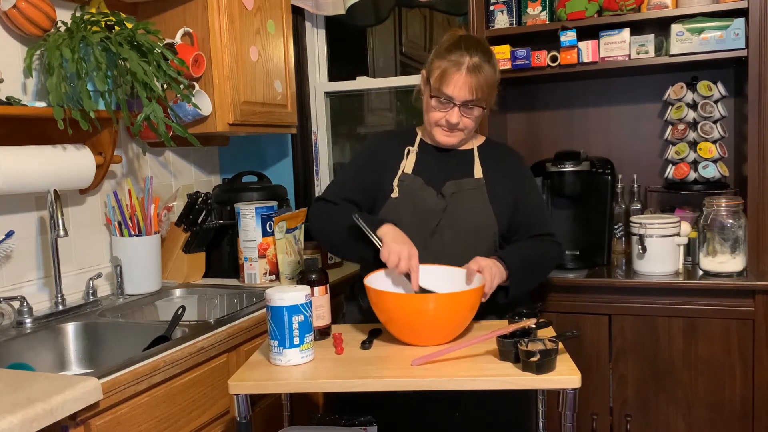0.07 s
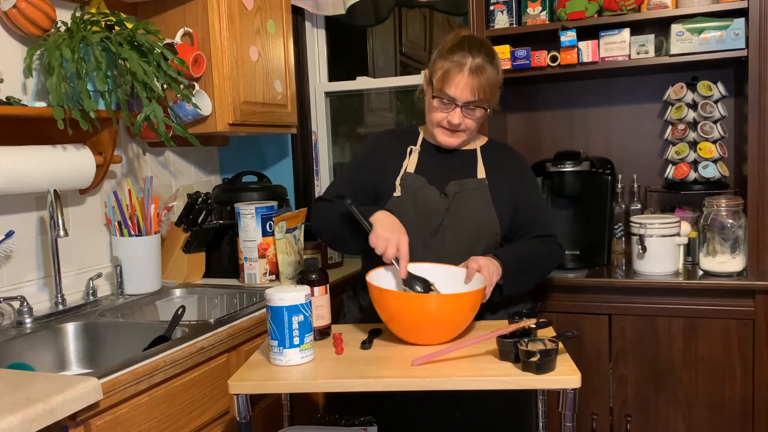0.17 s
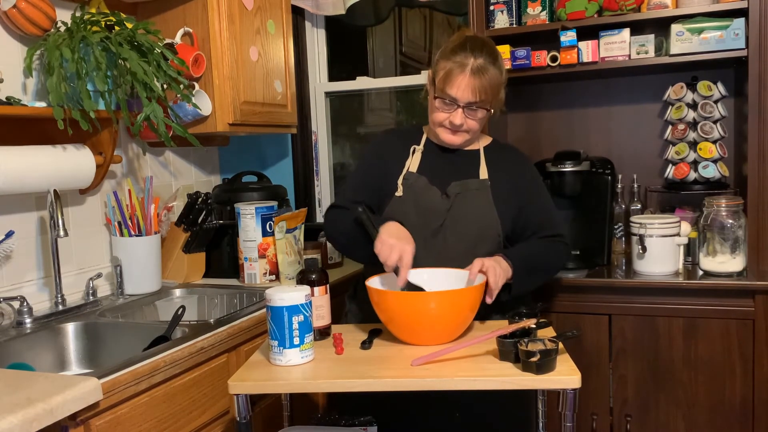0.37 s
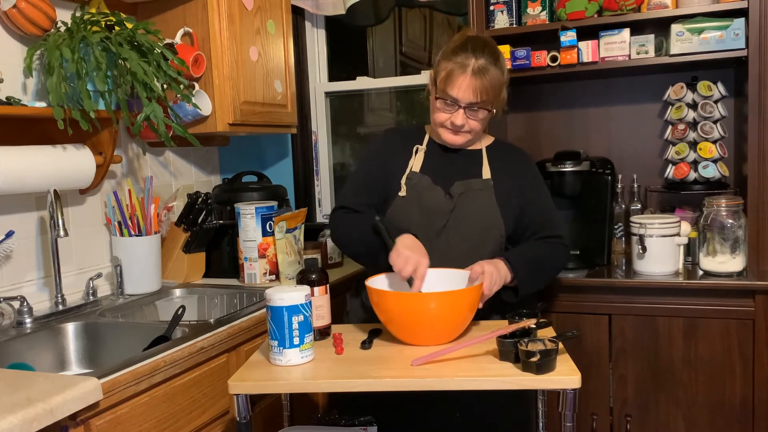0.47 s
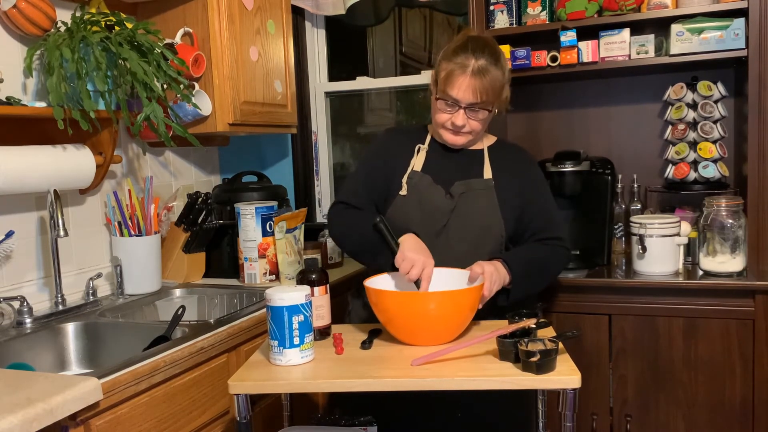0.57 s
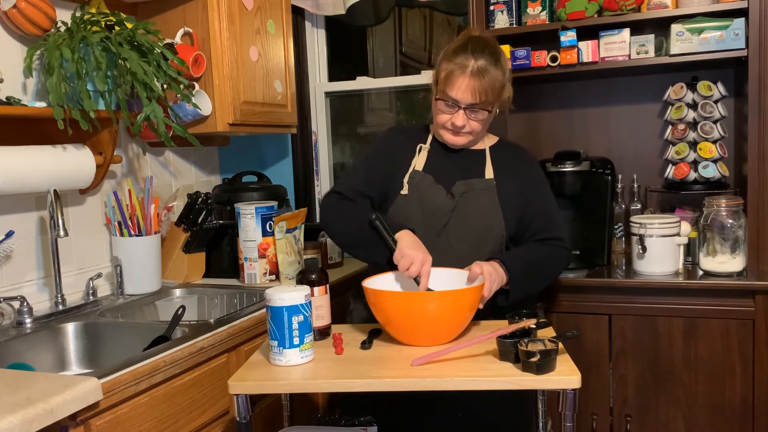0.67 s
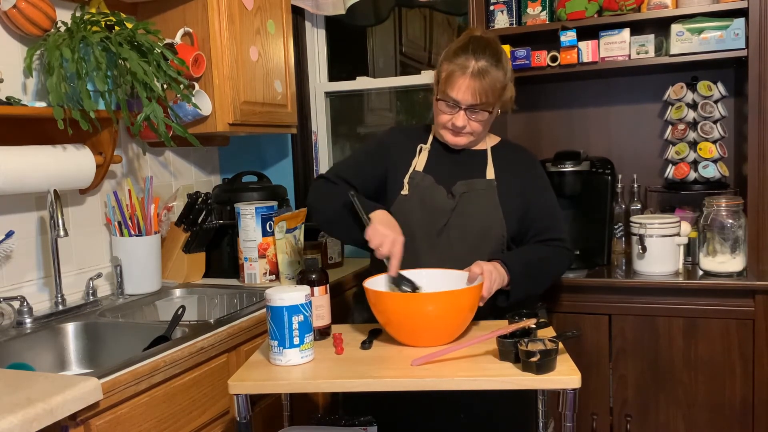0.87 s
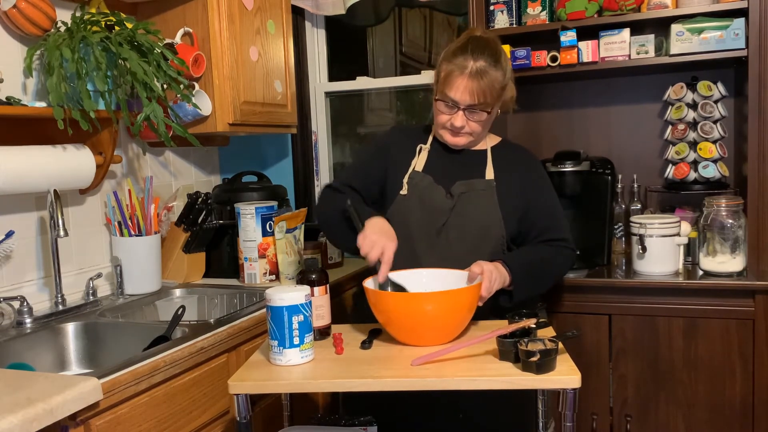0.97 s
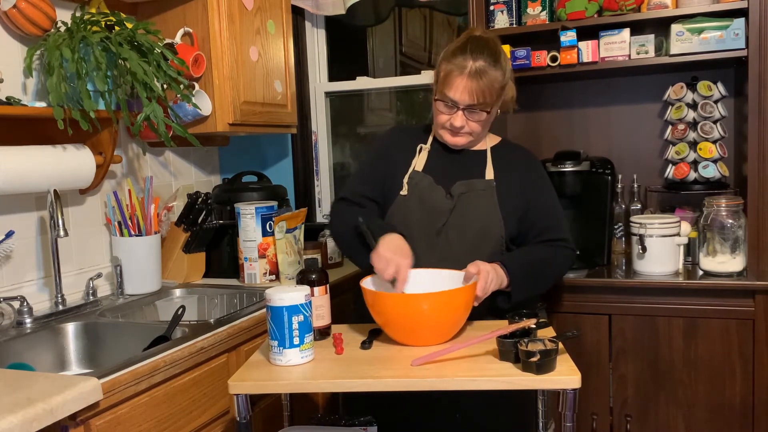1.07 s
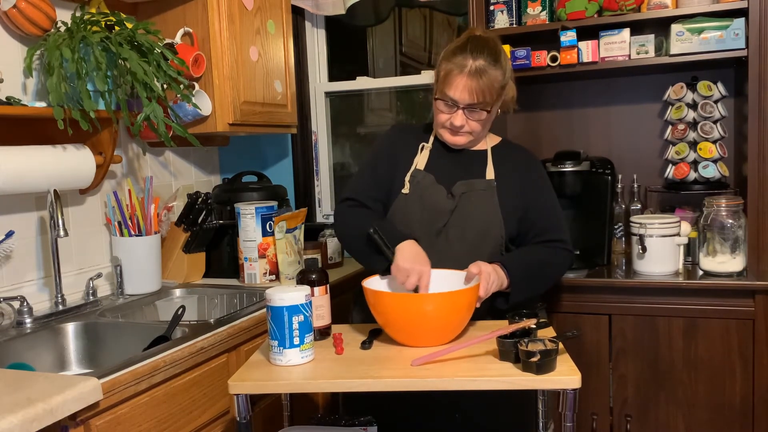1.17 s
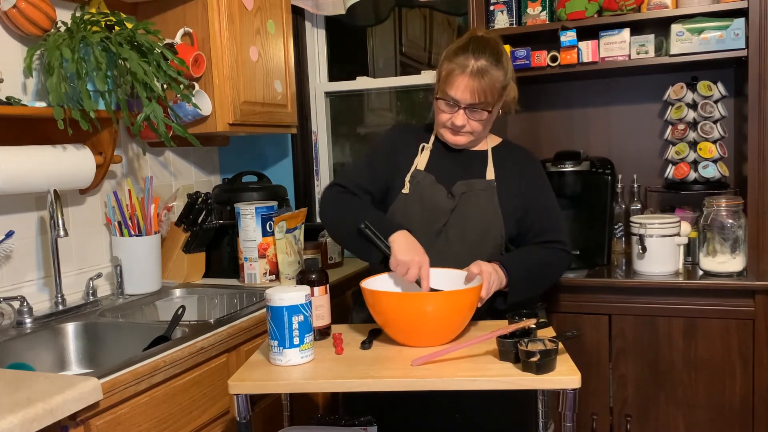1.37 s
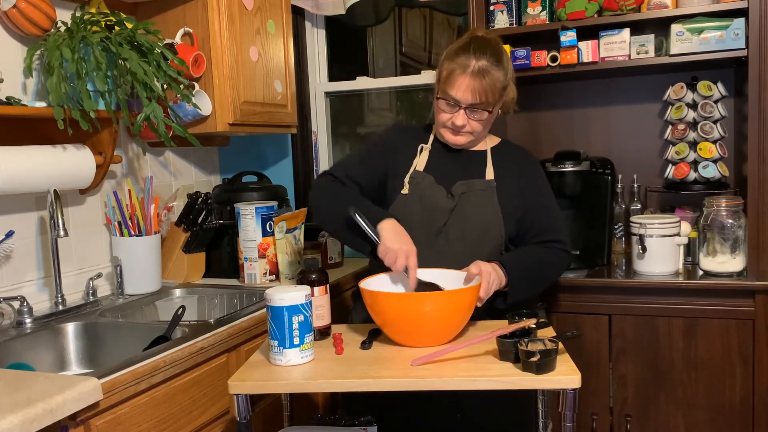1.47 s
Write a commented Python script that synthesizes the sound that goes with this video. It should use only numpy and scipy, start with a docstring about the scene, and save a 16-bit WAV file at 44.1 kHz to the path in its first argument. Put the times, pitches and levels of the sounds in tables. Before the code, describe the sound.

A spoon stirs stiff dough in a plastic bowl. A faint drag fades by 0.2 seconds, then a hard, hollow knock at 0.23 skids briefly and rings the bowl and wooden board. Soft low rubs follow around 0.35 to 0.9, with a tiny wet click near 0.68. Brighter, rougher scrapes come from 0.95 to 1.2, then fade. Low hum, quiet hiss and short kitchen echo surround it.

```python
"""A low hum and quiet hiss fill a small kitchen as a spoon drags through stiff dough in a plastic bowl.
Then the spoon knocks the wall hard and skids, ringing the bowl and its wooden board.
More short strokes follow, with small wet clicks from the dough. Hum is a wavering sine and hiss is
shaped noise; strokes are dense random slips through broad resonances, clicks are brief ringing tones,
and the room is a fading noise echo."""
import sys
import numpy as np
from scipy import signal
from scipy.fft import rfft, irfft
from scipy.io import wavfile

SR = 44100
rng = np.random.default_rng(int(sys.argv[2]) if len(sys.argv) > 2 else 0)


def how_loud(loudness_db):
    """Turn decibels into a plain amplitude multiplier (0 dB gives 1, 20 dB gives 10)."""
    steps = np.asarray(loudness_db, float) / 20
    return 10 ** steps


def waveform_to_disk(signal):
    """Save audio, clipped to [-1, 1], as 16-bit WAV at the path in sys.argv[1]."""
    frames = np.transpose(np.atleast_2d(signal))
    scaled = np.clip(frames, -1, 1) * 32767
    samples = np.round(scaled).astype(np.int16)
    wavfile.write(sys.argv[1], SR, samples)


N = 66150   # 1.5 s of samples


def rms_one(x):
    """Scale a sound to an average strength (rms) of 1."""
    return x / np.sqrt(np.mean(x ** 2) + 1e-20)


def at_hz(points, hz):
    """Read a curve of (Hz, value) points, with frequency on a log axis."""
    points_hz, values = np.transpose(points)
    return np.interp(np.log(hz), np.log(points_hz), values)


def ring(clicks, hz, t60):
    """A unit click starts a sine of height 1 that falls by 60 dB in t60 seconds."""
    r = how_loud(-60 / (t60 * SR))
    w = 2 * np.pi * hz / SR
    return signal.lfilter([0, np.sin(w)], [1, -2 * r * np.cos(w), r * r], clicks + 1e-18)


def resonate(x, hz, width_hz):
    """A resonance lets through sound near one frequency, with gain about 1 at its peak."""
    r = np.exp(-np.pi * width_hz / SR)
    feedback = [1, -2 * r * np.cos(2 * np.pi * hz / SR), r * r]
    return signal.lfilter(np.array([1, 0, -1]) * (1 - r * r) / 2, feedback, x)


def resonate_twice(x, hz, width_hz):
    """The same resonance applied twice has steeper sides."""
    return resonate(resonate(x, hz, width_hz), hz, width_hz)


def through(x, body):
    """Broad resonances of alternating sign sound side by side; the sum has rms 1."""
    total = 0
    for k, (hz, width_hz, db) in enumerate(body):
        total = total + (-1) ** k * how_loud(db) * resonate_twice(x, hz, width_hz)
    return rms_one(total)


def soften(x, corner_hz):
    """Two equal smoothing steps round off whatever changes faster than the corner."""
    r = np.exp(-2 * np.pi * corner_hz / SR)
    return signal.lfilter([(1 - r) ** 2], [1, -2 * r, r * r], x)


def drift(corner_hz):
    """Smoothed noise wanders at random with rms 1; the first second is cut while it settles."""
    return rms_one(soften(rng.standard_normal(N + SR), corner_hz)[SR:])


# How wide the surrounding sound is. Each row: frequency in Hz, side level against mid in dB.
SIDE_LEVEL = [(40, -8), (125, -13.5), (400, -2.5), (1400, 0), (4000, 2), (8000, -3.5), (14000, 9.5)]


def diffuse(size, shape):
    """Sound from all around: half-octave bands of mid and side noise, each scaled by shape(Hz)."""
    settle = 4000   # samples cut while the filters start up
    white = rng.standard_normal((2, 2, size + settle))   # neighbouring bands use separate noise
    edges = 30 * 2 ** np.arange(0, 9.3, .5)
    out = 0
    for k, (low, high) in enumerate(zip(edges, edges[1:])):
        sos = signal.butter(2, [low, high], "band", fs=SR, output="sos")
        band = signal.sosfilt(sos, white[k % 2])[:, settle:]
        hz = np.sqrt(low * high)
        mid_side = how_loud(np.array([[0], [at_hz(SIDE_LEVEL, hz)]]))
        out = out + band * shape(hz) * mid_side
    return out


# Tone of the room's hiss. Each row: frequency in Hz, relative level in dB per Hz.
HISS_TONE = [(18, -32), (30, -12), (70, -8.5), (252, -19.5), (649, -23), (1250, -38), (1810, -27.5),
             (8080, -55), (9460, -40), (11700, -38), (16000, -55.5)]


def background():
    """An appliance hums as a sine plus narrow noise that makes it waver; shaped noise hisses over it."""
    hiss_db, hum_db, waver_db = -68, -63.5, -4.5   # waver is set against the hum
    hum_hz, waver_width_hz = 59.5, 10.5            # width of each of two passes
    hiss = diffuse(N, lambda hz: how_loud(at_hz(HISS_TONE, hz)))
    waver = resonate_twice(rng.standard_normal(N + SR), hum_hz, waver_width_hz)[SR:]
    steady = np.sin(2 * np.pi * hum_hz * np.arange(N) / SR)
    hum = steady + how_loud(waver_db) * rms_one(waver)
    hum_mid_side = how_loud(np.array([[0], [-15.0]]))   # the hum is mostly in the middle
    return how_loud(hiss_db) * hiss / np.std(hiss[0]) + how_loud(hum_db) * hum * hum_mid_side


# Strength of the strokes over time, joined by straight lines.
# Each row: time in seconds, then wall resonance, rasp and treble levels, all in dB.
STROKE_LEVELS = [(0, -61.5, -71, -80), (.1, -66.5, -72.5, -80.5), (.15, -74, -97.5, -97),
                 (.2, -94, -97, -100), (.36, -69, -73, -104), (.45, -64, -70.5, -82),
                 (0.509, -62, -73.5, -83), (.56, -81, -92, -89), (.63, -67.5, -96, -92),
                 (.675, -82, -85, -90), (.7, -77, -81, -90), (.76, -79, -89.5, -91.5),
                 (.81, -87, -72.5, -87), (0.861, -62, -80, -92), (0.934, -101, -96, -100),
                 (0.95, -66, -59, -65.5), (0.984, -61.5, -67, -77.5), (1.019, -54.5, -60, -62),
                 (1.06, -60, -64.5, -71), (1.101, -54, -53, -58), (1.134, -57, -61.5, -59),
                 (1.18, -58.5, -61.5, -66), (1.221, -66.5, -71.5, -78.5), (1.31, -74, -80.5, -80.5),
                 (1.5, -79.5, -83, -88.5)]
# Broad resonances of the wall, the rasp and the treble.
# Each row: frequency in Hz, width of one of two passes in Hz, relative level in dB.
WALL_BODY = [(476, 120, -2.5), (629.5, 133, 4), (1000, 610, -10.5), (285, 250, -9), (147, 110, -1)]
RASP_BODY = [(1724, 514, -3), (2294, 850, -8), (3175, 1400, -14.5), (1300, 420, -15.5)]
TREBLE_BODY = [(4630, 5100, 4), (7100, 4300, -0.5), (11900, 12000, -2.5)]


def strokes():
    """Dense uneven slips of the spoon edge sound through the wall's broad resonances."""
    slips_per_s, slip_spread_db = 6000, 2.5
    surge_corner_hz, surge_db = 54, 2.5   # the edge catches and lets go
    seconds, *levels = np.transpose(STROKE_LEVELS)
    t = np.arange(N) / SR
    surge = surge_db * drift(surge_corner_hz)   # shared by all three bodies
    out = 0
    for body, db in zip((WALL_BODY, RASP_BODY, TREBLE_BODY), levels):
        sizes = how_loud(slip_spread_db * np.minimum(rng.exponential(1, N), 5))
        sizes = sizes * rng.choice([-1, 1], N)
        slips = sizes * (rng.random(N) < slips_per_s / SR)
        out = out + through(slips, body) * how_loud(np.interp(t, seconds, db) + surge)
    return out


# Contacts of the hard knock. Each row: time in seconds, level in dB, contact softness as a corner in Hz
# (lower is softer).
CONTACTS = [(0.2325, -17.5, 4060), (0.2353, -10.5, 1500), (.277, -22.5, 1180)]
# Ringing tones of bowl and board. Each row: frequency in Hz, relative level in dB,
# time to fall by 60 dB in seconds.
BOWL_MODES = [(54, -19.5, 0.17), (79.5, -14, 0.12), (127, -9.5, 0.14), (192.5, -5, 0.096),
              (300, -7.5, 0.066), (402.4, -2.5, 0.051), (474, -2, 0.057), (660, -1.5, 0.0415),
              (818, -8.5, 0.096), (1012, -8.5, 0.039), (1322, -9.5, 0.083), (1716, -5, 0.043),
              (1980, -5, 0.042), (2380, -5, 0.044)]
# Open rasp of the skid. Each row: frequency in Hz, width of one of two passes in Hz, relative level in dB.
SKID_BODY = [(533, 480, 1.5), (894, 580, 3.5), (1500, 940, -0.5), (2300, 1080, 1.5), (4270, 1800, -5.5),
             (6600, 3400, -18.5), (12500, 7700, -15.5)]


def knock():
    """Soft contacts and a short rough skid ring the bowl and board; the skid also rasps in the open."""
    start_s, swell_s, hold_until_s, fall_t60_s = .2325, 0.0077, 0.26, 0.15
    push_db, rasp_db, modes_db = -57.5, -32.5, -6.5
    t = np.arange(N) / SR
    swell = np.clip((t - start_s) / swell_s, 0, 1)
    skid = swell * how_loud(-60 * np.maximum(t - hold_until_s, 0) / fall_t60_s)
    push = how_loud(push_db) * skid * rng.standard_normal(N)
    for s, db, soft_hz in CONTACTS:
        click = np.zeros(N)
        click[int(s * SR)] = how_loud(db)
        push += soften(click + 1e-18, soft_hz)
    out = how_loud(rasp_db) * skid * through(rng.standard_normal(N), SKID_BODY)
    for k, (hz, db, t60) in enumerate(BOWL_MODES):
        out = out + (-1) ** k * how_loud(db + modes_db) * ring(push, hz, t60)
    return out


# Wet clicks. Each row: time in seconds, level in dB, frequency in Hz, time to fall by 60 dB in seconds.
WET_CLICKS = [(0.6809, -42.5, 1940, 0.0041), (.9503, -50, 2100, 0.0074), (0.952, -49, 4400, 0.0041)]


def clicks():
    """Small pockets in the dough snap open, each a very short ringing tone."""
    out = np.zeros(N)
    for s, db, hz, t60 in WET_CLICKS:
        click = np.zeros(N)
        click[int(s * SR)] = how_loud(db)
        out += resonate(ring(click, hz, t60), hz, hz / 2)
    return out


# How long the echo lasts. Each row: frequency in Hz, time to fall by 60 dB in seconds.
ECHO_T60 = [(50, 0.58), (130, 0.32), (350, 0.23), (920, 0.2), (2430, 0.21), (6400, 0.23)]
# Tone of the echo. Each row: frequency in Hz, relative level in dB.
ECHO_TONE = [(60, 6), (300, 0.5), (1000, 3), (3000, 8), (6000, 3.5), (14000, -6)]


def kitchen(x):
    """Reflections build up, then die away band by band, in mid and side."""
    echo_db, rise_s = -5, 0.0033
    t = np.arange(SR // 2) / SR
    tail = diffuse(len(t), lambda hz: how_loud(at_hz(ECHO_TONE, hz) - 60 * t / at_hz(ECHO_T60, hz)))
    tail = tail * (1 - np.exp(-t / rise_s))
    tail = how_loud(echo_db) * tail / np.sqrt(np.sum(tail[0] ** 2))
    return signal.fftconvolve(x[None], tail, axes=1)[:, :N]


def scene():
    """Direct sound near the middle, room and background around it; returns left and right."""
    port_lag_db = 4
    bowl = knock() + strokes() + clicks()
    # direct sound reaches one microphone port a little earlier: its slope leaks into the side
    direct = np.array([bowl, how_loud(port_lag_db) * np.gradient(bowl)])
    mid, side = kitchen(bowl) + background() + direct
    return np.array([mid + side, mid - side])


def notch(x, centre_hz, width_hz, db):
    """A smooth dip in the spectrum, deepest at its centre."""
    hz = np.fft.rfftfreq(N, 1 / SR)
    dip = np.exp(-((hz - centre_hz) / width_hz * 2) ** 2)
    return irfft(rfft(x) * how_loud(db * dip), N)


def band_limit(x):
    """A steep low-pass at the top of the band."""
    return signal.sosfilt(signal.butter(12, 16430, fs=SR, output="sos"), x)


def record(dry):
    """The microphone ports cut one notch in the mid and another in the side."""
    left, right = dry
    mid = notch((left + right) / 2, centre_hz=9700, width_hz=1240, db=-14.5)
    side = notch((left - right) / 2, centre_hz=13000, width_hz=2700, db=-26)
    return band_limit(np.array([mid + side, mid - side]))


dry = scene()
out = record(dry)
waveform_to_disk(out)
```